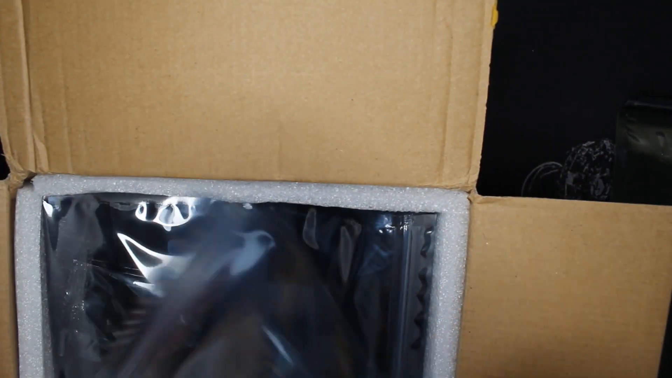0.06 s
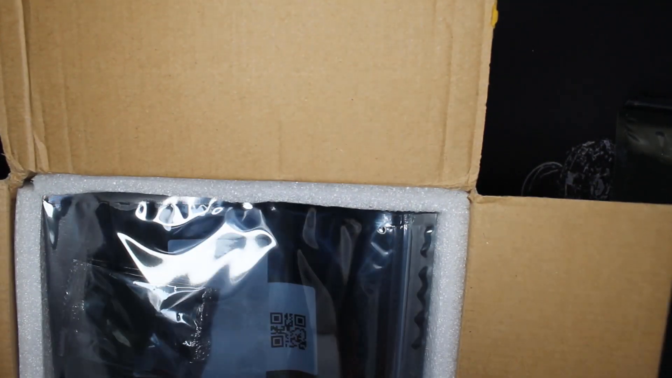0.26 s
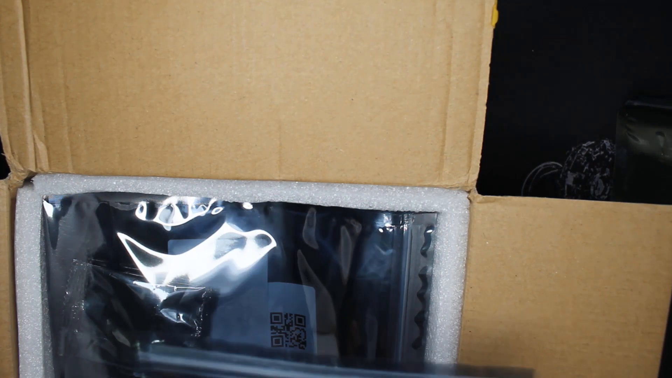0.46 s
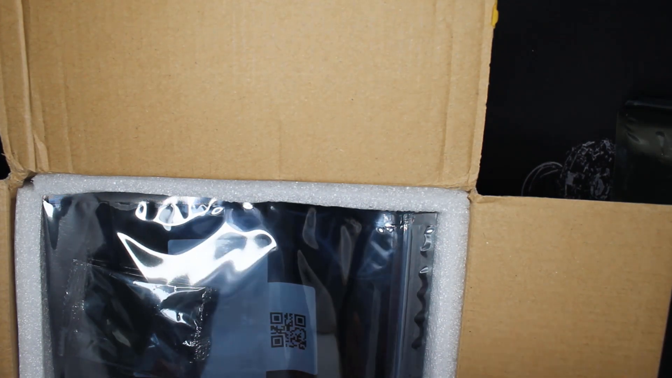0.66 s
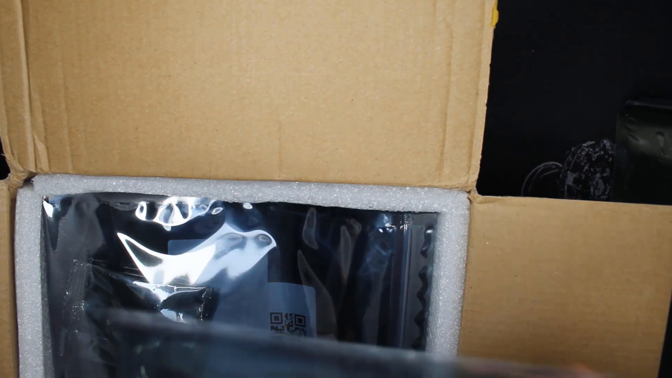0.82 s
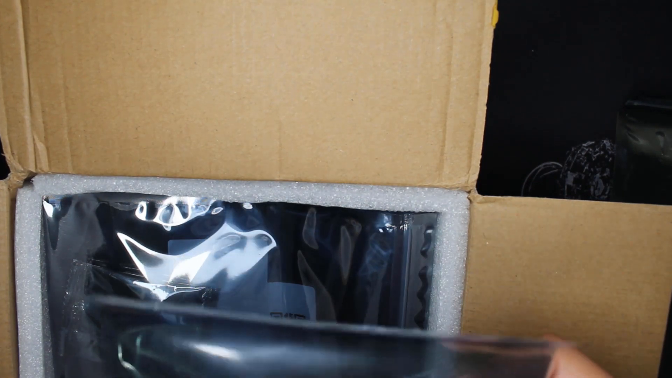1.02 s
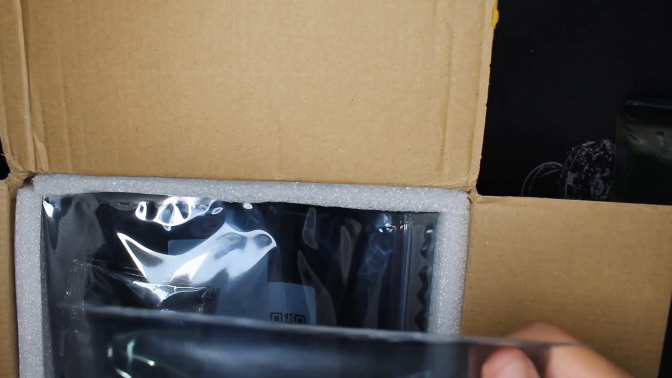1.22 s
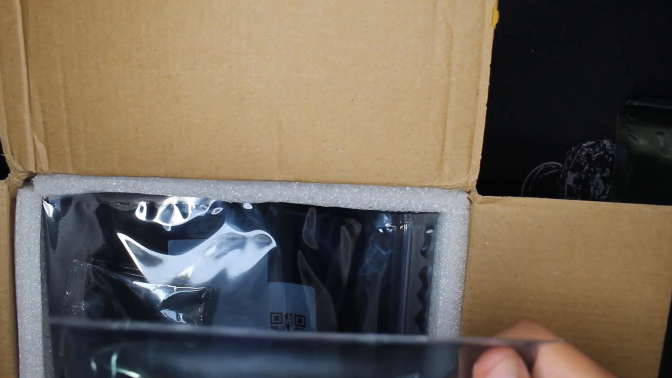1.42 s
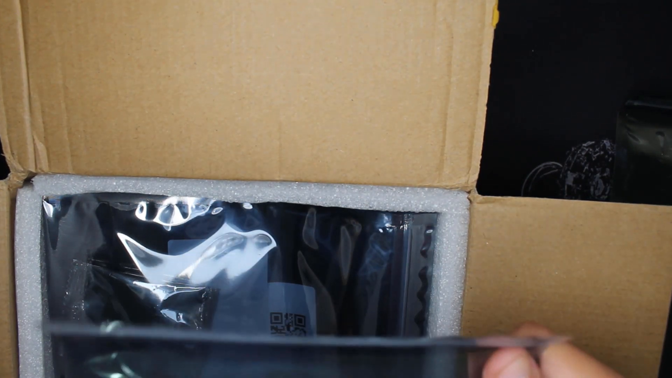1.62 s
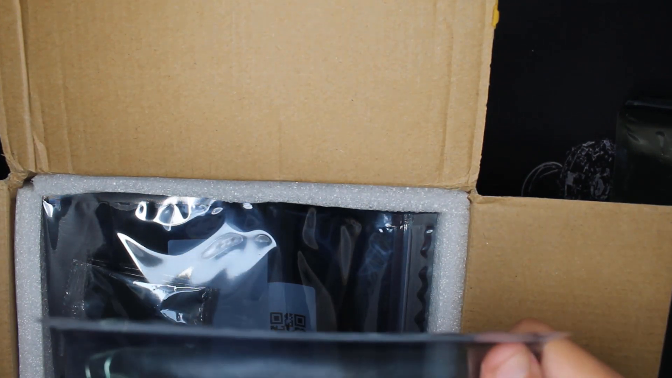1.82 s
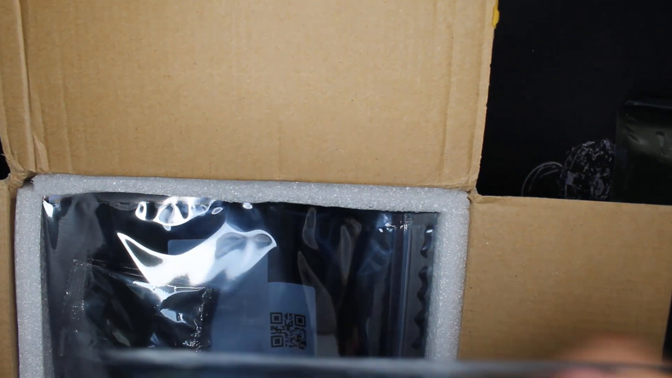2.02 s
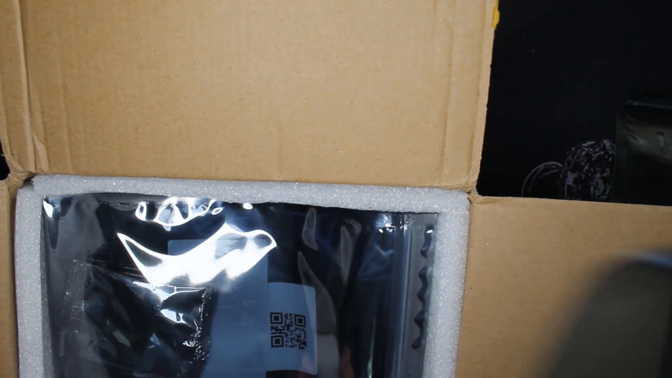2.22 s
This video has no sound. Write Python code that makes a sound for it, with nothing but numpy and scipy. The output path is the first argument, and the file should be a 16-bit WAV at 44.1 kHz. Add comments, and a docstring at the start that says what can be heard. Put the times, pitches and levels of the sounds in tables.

```python
"""A stiff plastic bag is lifted over a cardboard box in a small room. First the film slides over other
bags with a fine grainy rustle, creases snap through one at a time and puffs of air thump softly on
the close microphone. At 0.6 s the sheet flaps, pushing air, and the sharpest crease lets go.
After a few more snaps the bag is held almost still, with one more flap near 1.4 s.
From about 1.75 s it is drawn away with fresh snaps, two low thumps and a last faint rustle."""
import sys
import numpy as np
from scipy import signal
from scipy.fft import rfft, irfft
from scipy.io import wavfile
from scipy.ndimage import uniform_filter1d

SR = 44100
rng = np.random.default_rng(int(sys.argv[2]) if len(sys.argv) > 2 else 0)


def output_pcm(signal):
    """Save a mono or channel-first signal as 16-bit PCM at the path in sys.argv[1].

    Samples are clipped to [-1, 1] before scaling.
    """
    pcm = np.clip(np.atleast_2d(signal).T, -1, 1) * 32767
    wavfile.write(sys.argv[1], SR, np.round(pcm).astype(np.int16))


N = 101430
T = np.arange(N) / SR
CUTOFF_HZ = 15700


def from_db(db):
    """Decibels to gain."""
    return 10 ** (np.asarray(db) / 20)


def unit_rms(x):
    """Scale to unit rms."""
    return x / np.sqrt(np.mean(x ** 2) + 1e-20)


def curve_db(curve, hz):
    """Read an EQ curve on a log-frequency axis."""
    f, db = np.transpose(curve)
    return np.interp(np.log(hz + 1), np.log(f), db)


def equalise(x, curve):
    """Shape a sound with an EQ curve, keeping only what lies above 10 Hz."""
    hz = np.fft.rfftfreq(len(x), 1 / SR)
    return irfft(rfft(x) * from_db(curve_db(curve, hz)) * (hz > 10), len(x))


def minimum_phase(gain):
    """An impulse with this spectrum that starts at once and rings out."""
    cepstrum = irfft(np.log(gain + 1e-9))
    half = len(cepstrum) // 2
    cepstrum[1:half] *= 2
    cepstrum[half + 1:] = 0
    return irfft(np.exp(rfft(cepstrum)))


def add(out, t, x):
    """Mix a sound in at t seconds."""
    i = int(np.clip(t * SR, 0, N - 1))
    out[i:i + len(x)] += x[:N - i]


def crack(size, shiver_db=3, t60_s=0.013, top_hz=10400):
    """A click and the sheet's brief, uneven shiver after it, evened out in colour."""
    shiver = rng.standard_normal(size) * rng.exponential(1, size) * from_db(-60 * T[:size] / t60_s)
    shiver = signal.sosfilt(signal.butter(2, top_hz, fs=SR, output="sos"), shiver)
    burst = shiver / np.linalg.norm(shiver) * from_db(shiver_db)
    burst[0] += 1  # the click
    smooth_power = uniform_filter1d(abs(rfft(burst)) ** 2, size=24)
    return signal.fftconvolve(burst, minimum_phase(1 / np.sqrt(smooth_power)))[:size]


def facet_ring_db(facets, hz, q=3.6):
    """Resonant peaks of the stiff facets that are set ringing."""
    return sum(db / (1 + (2 * q * (hz / ring_hz - 1)) ** 2) for ring_hz, db in facets)


# Peaks and hollows in the bag's tone: f/Hz, half width/Hz, gain/dB
BAG_EQ = [(1200, 64, -3.5), (3520, 800, -1), (7840, 1100, 4), (16000, 1500, -7.5)]
SNAP_BANDS_HZ = [450, 1000, 2200, 5500, 12000]  # band centres of a snap: f/Hz
# Crease hits: t/s, level/dB in each of the five bands, ringing facets [(f/Hz, boost/dB)]
CREASE_SNAPS = [(0.0639, -9.5, -16.5, -17.5, -24, -25, []), (0.1879, -25, -35, -12, -11, -31, [(2550, 8)]),
                (0.2077, -11, -8.5, -9, -12, -30, [(780, 7.5), (3550, 4)]),
                (0.3344, -11.5, -16.5, -19, -27, -55, []), (0.398, -16, -18, -17, -24.5, -65.5, []),
                (0.4697, -11, -11, 3.5, -5, -17, [(2150, 0), (7770, 9.5)]),
                (0.4926, -11, -16.5, -13, -17, -41, []), (0.5911, -12, -15.5, -21, -38, -45, []),
                (0.6136, -23, -20, -20.5, -22, -33, []), (0.6404, -2, -2.5, 0.5, -0.5, 7.5, [(900, 6.5),
                (2050, 8.5), (4700, 7), (7200, 9)]), (0.7686, -17.5, -11.5, -20, -16.5, -42, [(1750, 8.5),
                (2950, 12)]), (0.9219, -8, -14.5, -15, -17.5, -25, [(2000, 7), (4600, 7), (7050, 8)]),
                (1.002, -9.5, -14.5, -17.5, -29.5, -61, [(870, 10), (4250, 11)]),
                (1.174, -47.5, -42, -31.5, -33.5, -44, []), (1.4728, -22, -22, -25, -32.5, -47, []),
                (1.7594, -9.5, -6.5, -16.5, -24, -40, [(880, 5.5), (1700, 7.5), (3000, 15)]),
                (1.9025, -9.5, -10.5, -16, -20.5, -35.5, [(420, 10), (1000, 9)]),
                (1.9078, -6.5, -19.5, -20, -22, -34, []), (1.9537, -25, -30, -15.5, -28, -36, [])]


def crease_snaps(size=2048, trim_db=-1, low_cut_hz=177):
    """Each crease lets go with its own colour; returns the close sound and the room send."""
    close, send = np.zeros(N), np.zeros(N)
    hz = np.fft.rfftfreq(size, 1 / SR)
    bag_db = trim_db + sum(db / (1 + ((hz - centre) / width) ** 2) for centre, width, db in BAG_EQ)
    low_cut = (hz + 1) ** 2 / (hz ** 2 + low_cut_hz ** 2)
    for t, *levels, facets in CREASE_SNAPS:
        crease_db = curve_db(list(zip(SNAP_BANDS_HZ, levels)), hz)
        snap = minimum_phase(from_db(crease_db + bag_db + facet_ring_db(facets, hz)) * low_cut)
        add(close, t, signal.fftconvolve(crack(size), snap))
        add(send, t, snap)
    return close, send


def stick_slip(slips_per_s=1400, spread_db=1.5, clump_s=0.0044, clump_db=4.5, hiss_gain=0.48):
    """The film catches and lets go: clusters of tiny slips over a smooth hiss."""
    sizes = from_db(spread_db * np.minimum(rng.exponential(1, N), 4)) * rng.choice([-1, 1], N)
    grip = np.clip(rng.standard_normal(N), -2, 2)
    clumps = from_db(clump_db * np.interp(T / clump_s, np.arange(N), grip))
    slips = rng.random(N) < slips_per_s / SR
    return unit_rms(clumps * sizes * slips) + hiss_gain * rng.standard_normal(N)


# Tone of the rustle: f/Hz, gain/dB
SLIDE_EQ = [(300, -3), (900, 8), (1500, 1.5), (7000, -2), (9500, -7), (15000, -9)]
# Strokes: peak t/s, rise/s, fall/s, level/dB, tilt/(dB per octave), ringing facets [(f/Hz, boost/dB)]
SLIDE_STROKES = [(.04, 0.11, 0.068, -58, -0.5, []), (.138, 0.0099, 0.017, -48.5, 0.5, [(3900, 11.5)]),
                 (0.188, 0.013, 0.01, -51, 2.5, []), (0.219, .005, 0.0026, -41.5, -1.5, [(4300, 11.5)]),
                 (.245, 0.018, 0.015, -58.5, -0.5, []), (.281, 0.0031, 0.0047, -48.5, -4, []),
                 (.39, .05, 0.065, -60.5, -1.5, []), (.88, 0.028, 0.074, -65.5, 0, []),
                 (1.48, 0.048, 0.048, -70.5, 0.5, [(7000, 8)]), (1.911, 0.011, 0.0099, -53, -1, []),
                 (1.953, 0.029, 0.048, -56.5, 1, []), (2.011, 0.021, 0.046, -59, 1, []),
                 (2.176, 0.042, 0.019, -63.5, 0, []), (2.29, 0.069, .03, -66, 0, [])]


def film_slides(pivot_hz=3000):
    """Film rubs on film: a grainy rustle that swells and fades with each stroke."""
    out = np.zeros(N)
    friction = stick_slip()
    hz = np.geomspace(SLIDE_EQ[0][0], CUTOFF_HZ, 200)
    for t, rise, fall, db, tilt, facets in SLIDE_STROKES:
        tone_db = curve_db(SLIDE_EQ, hz) + tilt * np.log2(hz / pivot_hz) + facet_ring_db(facets, hz)
        rustle = equalise(np.roll(friction, rng.integers(N)), list(zip(hz, tone_db)))
        swell = np.exp(-.5 * ((T - t) / np.where(T < t, rise, fall)) ** 2)
        out += from_db(db) * swell * unit_rms(rustle)
    return out


# Soft low thumps of air on the microphone: t/s, level/dB, f/Hz
LOW_THUMPS = [(.024, -36.5, 70.6), (.037, -29, 73.5), (0.083, -38.5, 164), (0.214, -33.5, 79),
              (0.267, -27, 48.4), (0.335, -34.5, 90), (0.635, -37.5, 113.7), (0.923, -41, 104),
              (0.994, -39.5, 61.6), (1.906, -39, 85), (1.952, -36.5, 62.7)]


def low_thumps(attack_s=0.0015, t60_s=0.068, upper_ratio=2.7, upper_db=-12):
    """Air puffs on the close microphone, each puff voiced as two low tones that die away quickly."""
    out = np.zeros(N)
    envelope = (1 - np.exp(-T / attack_s)) * from_db(-60 * T / t60_s)
    for t, db, hz in LOW_THUMPS:
        phase = 2 * np.pi * hz * T
        tones = np.sin(phase) + from_db(upper_db) * np.sin(upper_ratio * phase)
        add(out, t, from_db(db) * envelope * tones)
    return out


# Slow flaps of the sheet: t/s, level/dB, half length/s
SHEET_FLAPS = [(0.596, -32, 0.017), (1.429, -31, 0.027)]


def sheet_flaps():
    """Each flap of the whole sheet draws the air away and pushes it back once."""
    out = np.zeros(N)
    for t, db, half_length in SHEET_FLAPS:
        swing = (T - t) / half_length
        out += from_db(db) * swing * np.exp(-.5 * swing ** 2)
    return out


# Bass-heavy tone of the pushed air: f/Hz, gain/dB
AIR_EQ = [(20, 3), (50, -9.5), (100, -17), (200, -26), (500, -44.5), (1200, -41), (4000, -62)]
# Fader ride of the pushed air: t/s, level/dB
AIR_RIDE = [(0, -55.5), (.12, -46), (.29, -38), (.39, -50), (.54, -52), (.6, -38.5), (.66, -46), (.78, -42),
            (.87, -58.5), (1, -45), (1.08, -55.5), (1.8, -52.5), (1.93, -46.5), (2.1, -52), (2.3, -54.5)]


def pushed_air():
    """Low buffeting at the microphone that follows the movement of the sheet."""
    rumble = equalise(rng.standard_normal(N), AIR_EQ)
    steady = rumble / np.sqrt(uniform_filter1d(rumble ** 2, size=4400))
    return steady * from_db(np.interp(T, *np.transpose(AIR_RIDE)))


# Tone of the reverb: f/Hz, gain/dB
REVERB_EQ = [(350, -3), (520, 5), (700, -10), (2400, -8), (6500, -6), (10000, -9), (15000, -18.5)]


def room_reverb(send, build_s=0.0049, t60_s=0.35, mode_hz=500, mode_t60_s=0.83, mode_db=-58.5):
    """The small room answers with a short diffuse tail and one lingering mode."""
    tail = rng.standard_normal(N) * from_db(-60 * T / t60_s) * (1 - np.exp(-T / build_s))
    response = equalise(tail / np.linalg.norm(tail), REVERB_EQ)
    response += from_db(mode_db - 60 * T / mode_t60_s) * np.sin(2 * np.pi * mode_hz * T)
    return signal.fftconvolve(send, response[:N // 2])[:N]


# Tone of the background bed: f/Hz, gain/dB
ROOM_TONE_EQ = [(20, -15), (60, -3.5), (120, -2), (180, -4), (290, -10), (450, -18.5), (1000, -22.5),
                (2000, -29), (6000, -34), (15000, -36)]


def room_tone(level_db=-60):
    """A faint, dark, steady bed of noise."""
    return from_db(level_db) * unit_rms(equalise(rng.standard_normal(N), ROOM_TONE_EQ))


def scene():
    """Mono mix: the bag and its reverb over low thumps, moving air and room tone."""
    snaps, snap_send = crease_snaps()
    rustle = film_slides()
    bed = room_tone()
    bag = snaps + rustle + room_reverb(snap_send + rustle)
    return (bag + low_thumps() + sheet_flaps() + pushed_air() + bed)[None]


def record(dry):
    """A steep high cut on the whole mix."""
    return signal.sosfilt(signal.ellip(10, .2, 80, CUTOFF_HZ, fs=SR, output="sos"), dry)


dry = scene()
out = record(dry)
output_pcm(out)
```